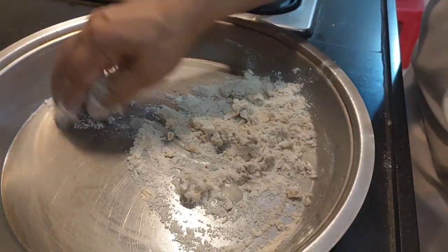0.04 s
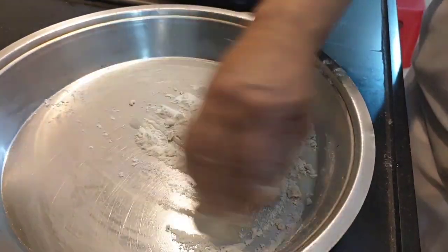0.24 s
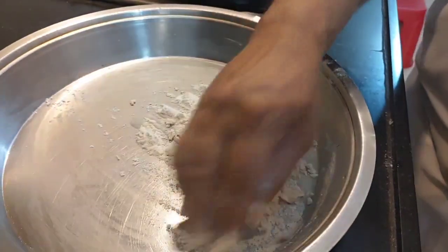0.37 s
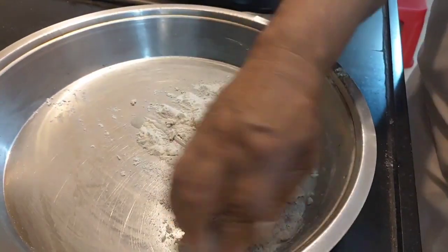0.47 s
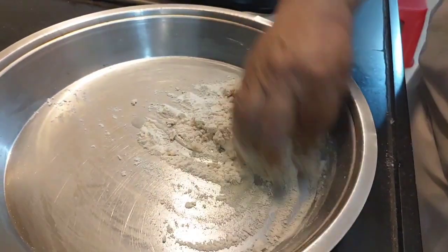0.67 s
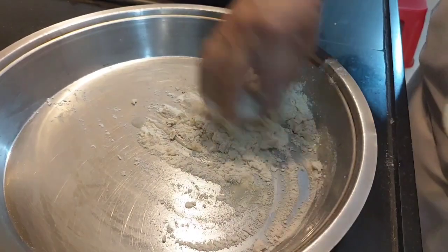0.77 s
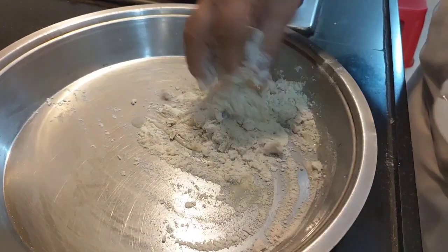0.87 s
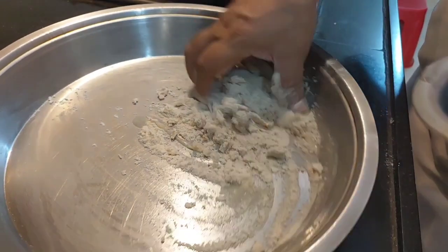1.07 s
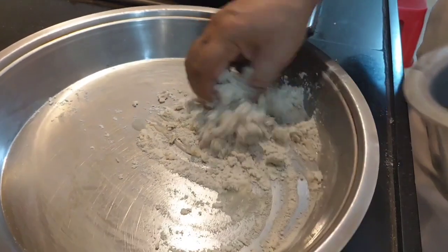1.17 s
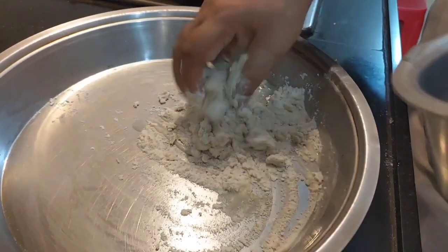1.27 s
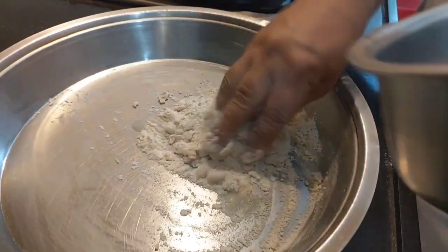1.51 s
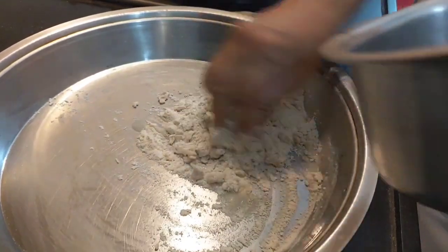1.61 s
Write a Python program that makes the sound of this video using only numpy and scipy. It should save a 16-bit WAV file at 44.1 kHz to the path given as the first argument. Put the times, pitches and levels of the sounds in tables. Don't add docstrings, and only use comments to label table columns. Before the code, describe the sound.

Fingers scrape gritty flour over a wide steel plate: a loud scratchy first stroke with nails biting, two weaker strokes, then a dull metallic knock and small chatter. Close, slightly muffled microphone in a quiet home kitchen.

```python
import sys
import numpy as np
from scipy import signal
from scipy.fft import rfft, irfft, next_fast_len
from scipy.io import wavfile
from scipy.ndimage import uniform_filter1d, map_coordinates

SR = 44100
rng = np.random.default_rng(int(sys.argv[2]) if len(sys.argv) > 2 else 0)


def gain_from_db(level_db):
    decades = np.asarray(level_db, float) / 20
    return 10 ** decades


def transcribe(signal):
    frames = np.atleast_2d(signal).T
    limited = np.clip(frames, -1, 1)
    pcm = np.round(limited * 32767).astype(np.int16)
    wavfile.write(sys.argv[1], SR, pcm)


N = 72765

# f/Hz, level/dB per Hz
HUM_COLOUR = [(13, -61.5), (22, -35), (160, -13.5), (263, -15), (382, -38), (766, -35.5), (911, -37),
              (1260, -40.5), (8300, -50.5), (10800, -84), (18300, -120)]
# t/s, level/dB, bottom modes over it/dB, rim modes over it/dB
SHUFFLE = [(0.0, -59, -1.5, -38), (0.11, -63, -16.5, -25), (0.156, -66, 3.5, -24), (0.27, -54.5, -0.5, -26),
           (0.486, -57, -2, -14.5), (0.56, -70, 10.5, -9), (0.582, -65, -17, -23), (0.648, -51, -12.5, -33),
           (0.67, -54.5, -7, -10), (0.822, -54.5, -6.5, -10.5), (0.85, -50.5, -18, -24.5),
           (0.922, -75, -23, -9.5), (0.996, -64, 6, -6), (1.152, -51, -9.5, -14), (1.3, -57, -12.5, -25),
           (1.346, -50.5, 3.5, -0.5), (1.576, -62, -11.5, -28), (1.65, -71.5, 8, -19)]
# f/Hz, width/Hz, level/dB
COUNTER_MODES = [(92.5, 14, -10.5), (146.7, 13, -0.5), (192.7, 26, -10.5)]
# f/Hz, width/Hz, level/dB
BOTTOM_MODES = [(211, 10, -5), (241.7, 13, 2.5), (293.5, 85, -6.5)]
# f/Hz, width/Hz, level/dB
RIM_MODES = [(422, 27, 11.5), (473, 86, -8.5)]
# t/s, length/s, f/Hz, width/Hz, level/dB
SMEARS = [(.001, 0.11, 1180, 120, -81), (.148, 0.079, 1170, 200, -70), (0.165, 0.03, 2130, 460, -64.5),
          (0.202, 0.057, 2200, 600, -53.5), (0.195, 0.1, 1190, 220, -53), (0.337, 0.037, 2124, 160, -44.5),
          (0.299, .08, 380, 83, -60.5), (.335, 0.27, 2900, 14, -59), (0.303, 0.086, 770, 61, -53),
          (0.468, .05, 1820, 150, -57), (0.667, 0.027, 1700, 250, -56.5), (.92, .13, 1090, 70, -74.5),
          (.99, 0.14, 1320, 200, -81), (1.189, .045, 1837, 150, -80), (1.2, 0.12, 1370, 170, -72),
          (1.23, .04, 2260, 350, -67), (1.258, 0.038, 710, 70, -64.5), (1.261, .025, 1800, 597, -59),
          (1.297, 0.024, 1290, 400, -63), (1.33, .09, 243, 25, -61), (1.36, 0.053, 1230, 150, -55),
          (1.362, 0.0625, 486, 30, -48), (1.383, .12, 1300, 600, -67.5)]
# t/s, f/Hz, peak level/dB
TICKS = [
    (1.3355, 1750, -31),
    (1.3412, 1590, -33),
    (1.197, 216, -47.5),
]
# f/Hz, level/dB, time to fall 60 dB/s
RING_MODES = [(224.3, 0, 0.35), (246.7, -4, 0.43), (524, -21, 0.33), (747, -2.5, 0.5), (762.3, 5, 0.42),
              (805, 4, 0.38), (1025, -14.5, 0.23), (1198, 4.5, 0.06), (1346, 0, 0.14), (1640, -20.5, 0.54),
              (1760, 8.5, 0.097), (1920, -29, .15)]
# t/s, level/dB, hardness as f/Hz
KNOCKS = [
    (1.2665, -71, 1970),
    (1.339, -25.5, 1890),
    (1.356, -43, 900),
    (1.417, -40.5, 1000),
    (1.472, -50, 1967),
]
# t/s, length/s, f/Hz, level/dB
NAILS = [(.214, .012, 4630, -48), (.228, .01, 5750, -44), (.262, .003, 5650, -39), (.2775, .005, 4830, -34),
         (.28, .007, 7550, -36), (.285, .002, 5200, -35), (.301, .003, 5700, -35), (.3055, .005, 4950, -29),
         (.308, .006, 7000, -36), (.313, .009, 5300, -32), (.317, .006, 7400, -37), (.327, .002, 5600, -33),
         (.3325, .004, 5200, -31), (.342, .004, 5200, -29), (.349, .003, 5400, -28),
         (.3545, .005, 5150, -29.5), (.354, .008, 7250, -36), (.445, .03, 5100, -42), (.45, .03, 7350, -47),
         (.676, .028, 5050, -48), (1.226, .017, 5000, -55)]
# t/s, scrape level/dB, soft rub over the scrape/dB
STROKES = [
    [(0.145, -100, 1), (0.165, -56.5, -28), (0.205, -64, -3), (0.233, -44, -10.5), (0.253, -45, -13.5),
     (0.283, -37, -17.5), (0.296, -43.5, -8)],
    [(0.296, -41, -15.5), (0.304, -33, -13.5), (0.33, -35, -13), (0.36, -35.5, -11), (0.384, -44.5, -7.5),
     (0.43, -46, -10)],
    [(0.43, -47.5, -10), (0.466, -40, -13), (0.564, -67.5, 0.5), (0.645, -63, -2)],
    [(0.645, -69, -1), (0.675, -45.5, -13), (0.763, -44.5, -15.5), (0.787, -46.5, -13), (0.81, -73.5, 5.5)],
    [(0.81, -58.5, -3), (0.842, -49, -10), (0.926, -79, 2.5), (0.968, -71, -11.5), (1.106, -99, 2),
     (1.12, -86.5, 2.5)],
    [(1.18, -101.5, 12), (1.2, -64, -22), (1.236, -51.5, -19), (1.33, -55.5, -11), (1.338, -64.5, 2),
     (1.372, -58.5, -9), (1.5, -102, 10.5)],
]
# f/Hz, level/dB per Hz
GRIT_COLOUR = [(1940, -51), (3300, -26.5), (3790, -7), (4340, -4.5), (5100, 1), (6190, -4.5), (7400, -5.5),
               (7800, -9), (8300, -8), (10800, -59), (18300, -120)]
# f/Hz, level/dB per Hz
RUB_COLOUR = [(530, -47), (900, -29.5), (1050, 1), (1250, -3), (1400, 1.5), (1650, 3.5), (2320, 3.5),
              (3400, -5), (4420, -41), (7480, -120)]
# f/Hz, width/Hz, level/dB
BRIGHT_MODES = [(3800, 22, -5), (4100, 20, 2.5), (4725, 50, 0), (5010, 55, 2), (5260, 53, 0), (5303, 42, 4),
                (5450, 30, -8), (5850, 36, 1), (6530, 27, -5), (7220, 15, -2), (7150, 97, -1.5),
                (7580, 120, 5)]
# f/Hz, width/Hz, level/dB
LASTING_MODES = [(4073, 10, -59), (3770, 14, -65)]
# f/Hz, width/Hz, level/dB
FLEX_MODES = [(640, 70, -11), (770, 45, 0), (890, 70, -9)]

HUM_DB, RUMBLE_DB, RUMBLE_HZ = -70, -75, 89
TICK_CYCLES = 13
HELD = 0.38
THUD_DB, ROOM_DB, ROOM_T60_S = 7, -7, 0.26
EARLIER_DB, EARLIER_HZ = -65.5, 766
NAIL_Q = 8
GRAINS_PER_S, GRAIN_SPREAD_DB, SLIP_DB, PATCH_DB = 14000, 2, 1.5, 1.6
MODE_T60_S, MODE_SHARE_DB, TAIL_T60_S, TAIL_DB = 0.075, 2, 0.34, -3
BRIGHT_DB = -6
PRESS_DB, PRESS_GROWS = -50, 0.73
PRESS_BUILDS_S, PRESS_ENDS_S = (0.2, 0.32), 0.63
HISS_DB, TOP_HZ, SLOPE_HZ = -92, 8250, 70


def unit(x):
    return x / np.sqrt(np.mean(x ** 2) + 1e-20)


def steady(x, span_s):
    power = np.abs(uniform_filter1d(x * x, size=round(span_s * SR)))
    return unit(x / np.sqrt(power + 1e-20))


def along(points, hz):
    f, value = np.transpose(points)
    return np.interp(np.log(hz + 1), np.log(f + 1), value)


def curves(rows):
    s, *columns = np.transpose(rows)
    return [np.interp(np.arange(N) / SR, s, column) for column in columns]


def wobble(rate):
    return map_coordinates(rng.standard_normal(600), [np.arange(N) * rate / SR])


def filtered(x, response):
    m = next_fast_len(N + SR // 2)
    return irfft(rfft(x, m) * response(np.fft.rfftfreq(m, 1 / SR)), m)[:N]


def resonances(peaks):
    def response(f):
        total = 0
        for k, (centre, width, db) in enumerate(peaks):
            damping = 1j * f * width
            total = total + (-1) ** k * gain_from_db(db) * damping / (centre * centre - f * f + damping)
        return total
    return response


def kitchen():
    hum = unit(filtered(rng.standard_normal(N), lambda f: gain_from_db(along(HUM_COLOUR, f))))
    rumble = filtered(rng.standard_normal(N), lambda f: (f > 45) / (1 + (f / RUMBLE_HZ) ** 6))
    return gain_from_db(HUM_DB) * hum + gain_from_db(RUMBLE_DB) * unit(rumble)


def shaken_body(peaks, mid_hz, width_hz):
    modes, band = resonances(peaks), resonances([(mid_hz, width_hz, 0)])
    rung = filtered(rng.standard_normal(N), lambda f: modes(f) * band(f) ** 2)
    return unit(steady(rung, 0.07) * gain_from_db(1.5 * wobble(40)))


def shuffle():
    level_db, bottom_db, rim_db = curves(SHUFFLE)
    counter = shaken_body(COUNTER_MODES, 70, 220)
    bottom = gain_from_db(bottom_db) * shaken_body(BOTTOM_MODES, 229.3, 260)
    rim = gain_from_db(rim_db) * shaken_body(RIM_MODES, 445, 200)
    return gain_from_db(level_db) * (counter + bottom + rim)


def smears():
    t, out = np.arange(N) / SR, np.zeros(N)
    for s, length, hz, width_hz, db in SMEARS:
        edges = [hz - width_hz / 2, hz + width_hz / 2]
        band = signal.butter(2, edges, "band", fs=SR, output="sos")
        rough = steady(signal.sosfilt(band, rng.standard_normal(N)), min(3 / width_hz, 0.04))
        swell = np.sin(np.pi * np.clip((t - s) / length, 0, 1) ** 0.9)
        out += gain_from_db(db) * swell * rough
    return out


def ticks():
    t, out = np.arange(N) / SR, np.zeros(N)
    for s, hz, db in TICKS:
        cycles = np.clip(t - s, 0, 1) * hz
        fade = gain_from_db(db - 60 * cycles / TICK_CYCLES) * (1 - np.exp(-cycles / 0.71))
        out += fade * np.sin(2 * np.pi * cycles)
    return out


def knocks():
    out, t = np.zeros(N + SR), np.arange(SR // 2) / SR
    for s, db, hard_hz in KNOCKS:
        ring = 0
        for (hz, level, t60), scatter in zip(RING_MODES, rng.standard_normal(len(RING_MODES))):
            fade = gain_from_db(level + 2 * scatter - 60 * t / (HELD * t60))
            softness = 1 + (hz / hard_hz) ** 4
            ring = ring + fade / softness * np.sin(2 * np.pi * hz * t)
        band = signal.butter(4, [0.5 * hard_hz, hard_hz], "band", fs=SR, output="sos")
        thud = signal.sosfilt(band, rng.standard_normal(len(t))) * gain_from_db(THUD_DB - 60 * t / 0.11)
        blow = gain_from_db(db - 9.5) * (ring + thud) * (1 - np.exp(-t / 0.0052))
        room = rng.standard_normal(len(t)) * gain_from_db(-60 * t / ROOM_T60_S) * (1 - np.exp(-t / 0.0051))
        answer = signal.fftconvolve(blow, room / np.linalg.norm(room))[:len(t)]
        out[round(s * SR):][:len(t)] += blow + gain_from_db(ROOM_DB) * answer
    beating = 1 + 0.48 * np.cos(2 * np.pi * 38 * t)
    out[:len(t)] += gain_from_db(EARLIER_DB - 60 * t / 0.11) * np.sin(2 * np.pi * EARLIER_HZ * t) * beating
    return out[:N]


def nails():
    t, out = np.arange(N) / SR, np.zeros(N)
    chatter = unit(rng.standard_normal(N) * gain_from_db(1.7 * wobble(300)))
    for s, length, hz, db in NAILS:
        attack = np.clip((t - s) / 0.0023, 0, 1)
        release = np.clip((s + length - t) / 0.0048 + 1, 0, 1)
        b, a = signal.iirpeak(hz, NAIL_Q, SR)
        bite = signal.lfilter(b, a, np.roll(chatter, rng.integers(N)))
        out += gain_from_db(db) * attack * release * steady(bite, 0.0033)
    return out


def grit():
    hit = rng.random(N) < GRAINS_PER_S / SR
    size_db = GRAIN_SPREAD_DB * rng.standard_normal(N) + SLIP_DB * wobble(220)
    crumbs = hit * rng.standard_normal(N) * gain_from_db(size_db)
    spectrum = signal.stft(crumbs, nperseg=256)[2]
    patches = uniform_filter1d(rng.standard_normal(spectrum.shape), size=4, axis=0)
    patches = uniform_filter1d(patches, size=5, axis=1)
    patchy = signal.istft(spectrum * gain_from_db(PATCH_DB * unit(patches)), nperseg=256)[1][:N]
    return steady(patchy, 0.02)


def plate(x):
    t = np.arange(SR // 2) / SR
    draw = rng.random((320, 2))
    mode_hz = 900 + 7600 * draw[:, :1]
    modes = np.sin(2 * np.pi * mode_hz * t) * gain_from_db(12 * draw[:, 1:])
    ring = modes.sum(axis=0) * gain_from_db(-60 * t / MODE_T60_S)
    tail = rng.standard_normal(len(t)) * gain_from_db(-60 * t / TAIL_T60_S)
    answer = gain_from_db(MODE_SHARE_DB) * ring / np.linalg.norm(ring)
    answer += gain_from_db(TAIL_DB) * tail / np.linalg.norm(tail)
    answer[0] += 1
    return signal.fftconvolve(x, answer / np.linalg.norm(answer))[:N]


def flexing(level_db):
    t = np.arange(N) / SR
    first = np.interp(t, PRESS_BUILDS_S, [0, 1]) ** 2 * (t < PRESS_ENDS_S)
    heavy = first * gain_from_db(PRESS_GROWS * (level_db - level_db.max()))
    modes, band = resonances(FLEX_MODES), resonances([(750, 500, 0)])
    flex = lambda f: modes(f) * band(f)
    noise = rng.standard_normal(N)
    return gain_from_db(PRESS_DB) * filtered(heavy * noise, flex) / np.std(filtered(noise, flex))


def strokes():
    level_db, dull_db = curves(np.vstack(STROKES))
    t = np.arange(N) / SR
    touch = sum((t >= s[0][0]) & (t < s[-1][0]) for s in STROKES) > 0
    push, crumbs = touch * gain_from_db(level_db), grit()

    colour = lambda f: gain_from_db(along(GRIT_COLOUR, f))
    scrape = plate(filtered(push * crumbs, colour)) / np.std(filtered(crumbs, colour))

    peaks = resonances(BRIGHT_MODES)
    bright = filtered(push * crumbs, lambda f: peaks(f) * (f > 2500))
    scrape = scrape + gain_from_db(BRIGHT_DB) * bright / np.std(filtered(crumbs, peaks))

    feed = touch * gain_from_db(0.53 * (level_db + 38.5))
    for hz, width_hz, db in LASTING_MODES:
        mode = resonances([(hz, width_hz, 0)])
        scrape = scrape + gain_from_db(db) * filtered(feed * crumbs, mode) / np.std(filtered(crumbs, mode))

    soft = unit(filtered(grit(), lambda f: gain_from_db(along(RUB_COLOUR, f))))
    rub = plate(push * gain_from_db(dull_db + 0.57 * wobble(30)) * soft)
    return scrape + rub + flexing(level_db)


def scene():
    background = kitchen() + shuffle()
    touches = smears() + ticks() + knocks()
    return (background + touches + nails() + strokes())[None]


def low_pass(x):
    return signal.sosfilt(signal.butter(12, 8450, fs=SR, output="sos"), x)


def record(dry):
    x = filtered(dry[0], lambda f: gain_from_db(-18 * np.logaddexp(0, (f - TOP_HZ) / SLOPE_HZ)))
    mix = x + gain_from_db(HISS_DB) * rng.standard_normal(N)
    return low_pass(mix[None])


dry = scene()
out = record(dry)
transcribe(out)
```